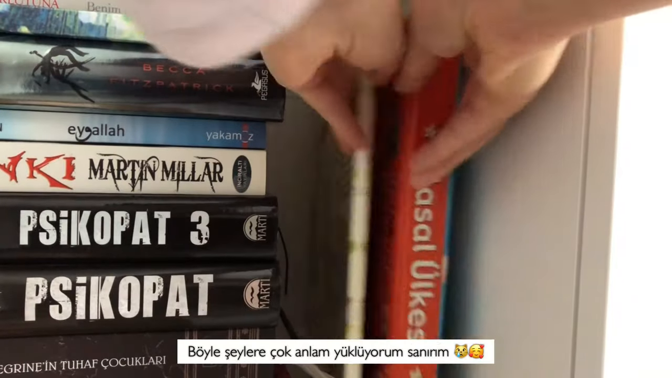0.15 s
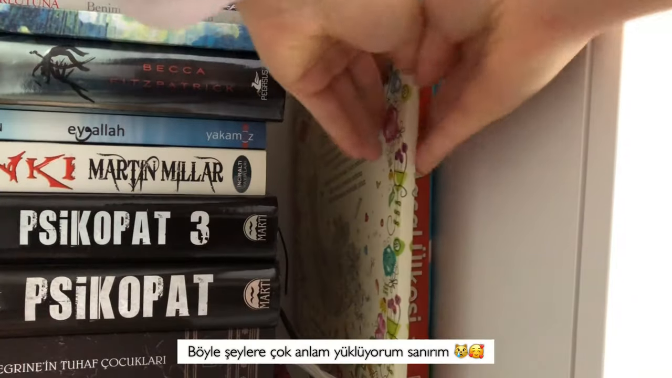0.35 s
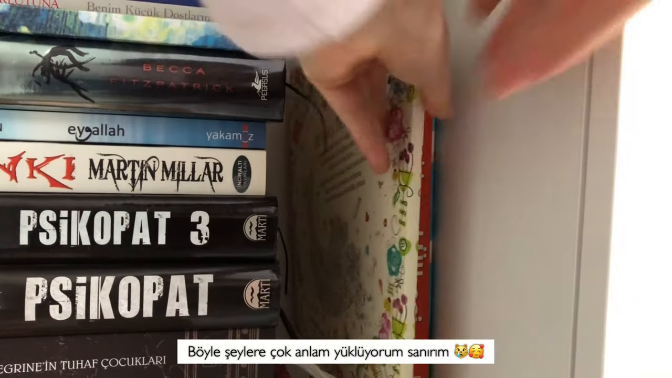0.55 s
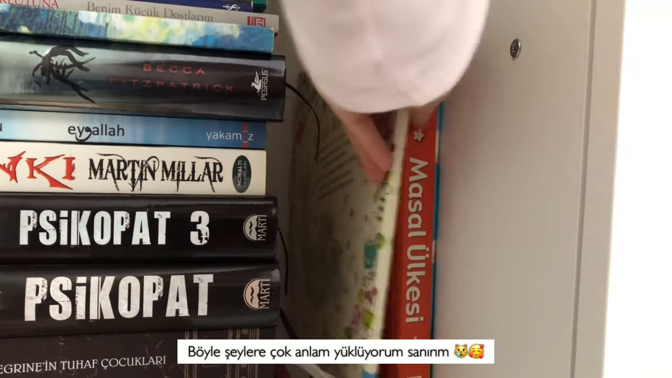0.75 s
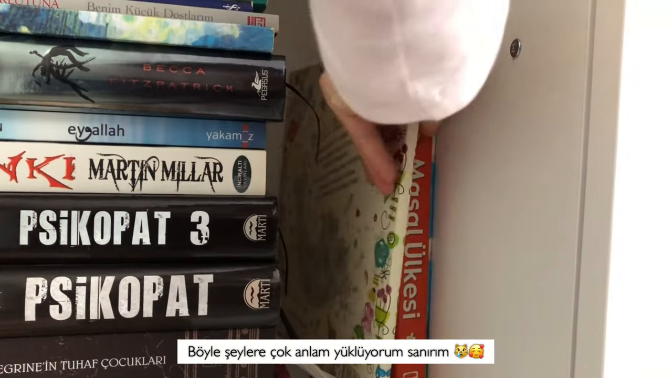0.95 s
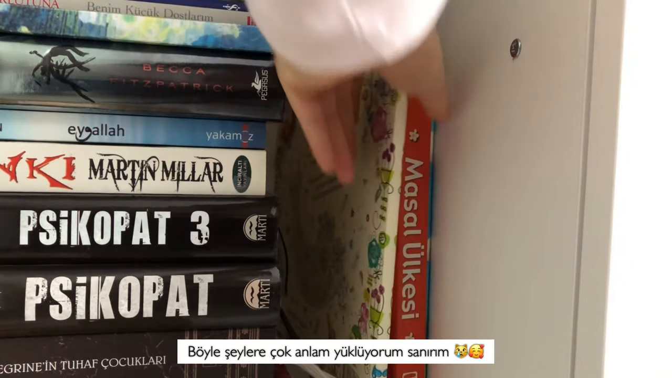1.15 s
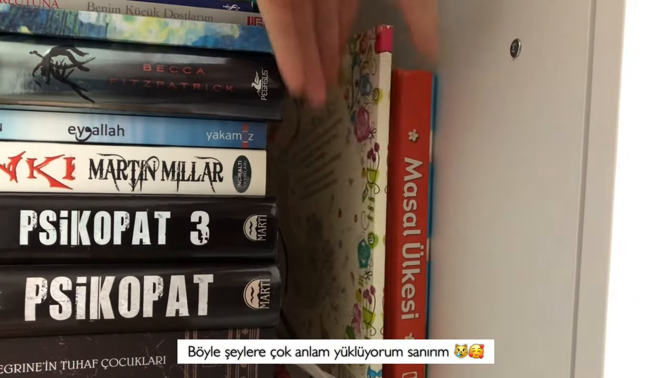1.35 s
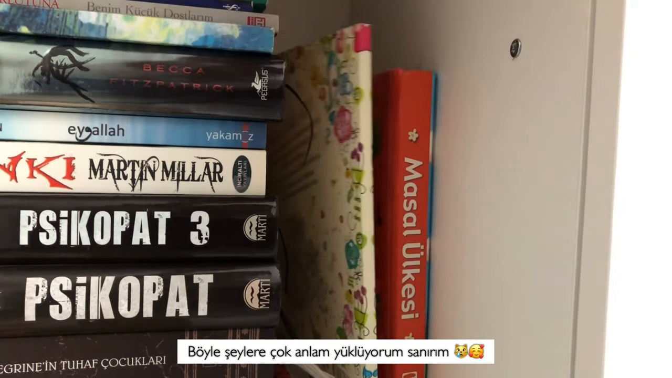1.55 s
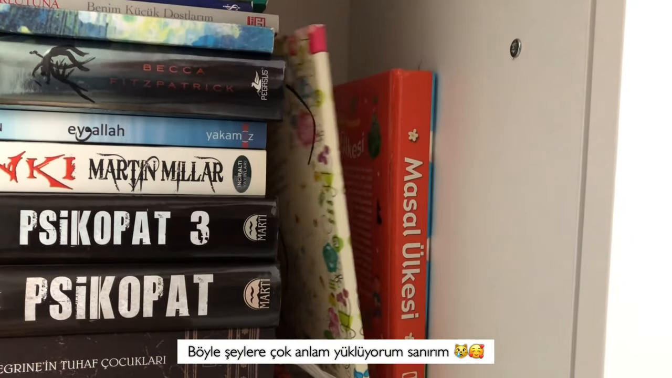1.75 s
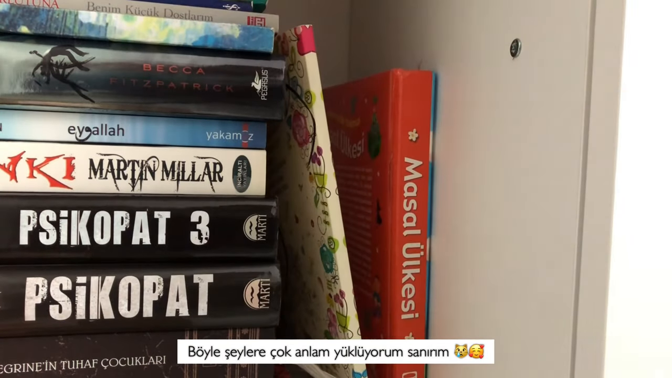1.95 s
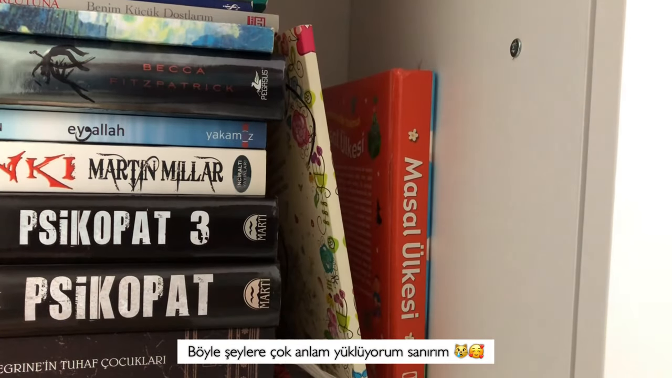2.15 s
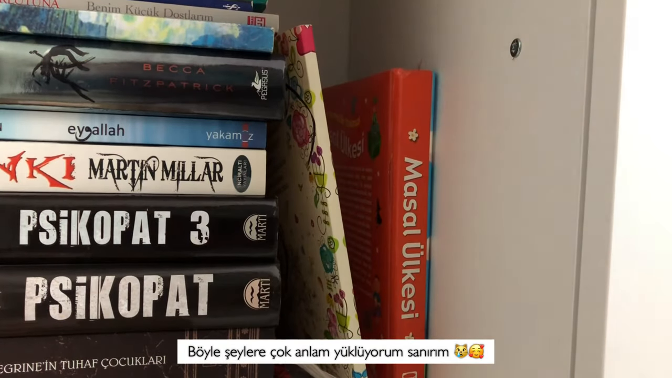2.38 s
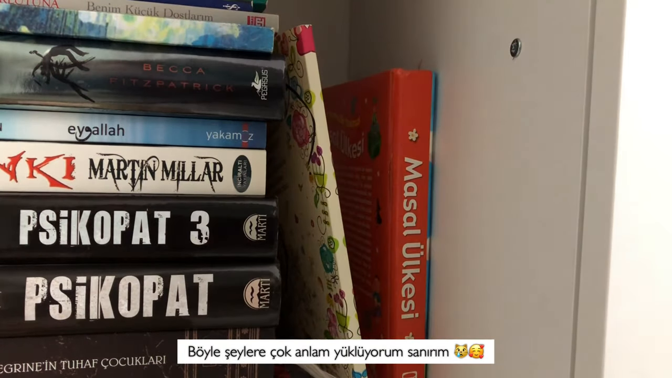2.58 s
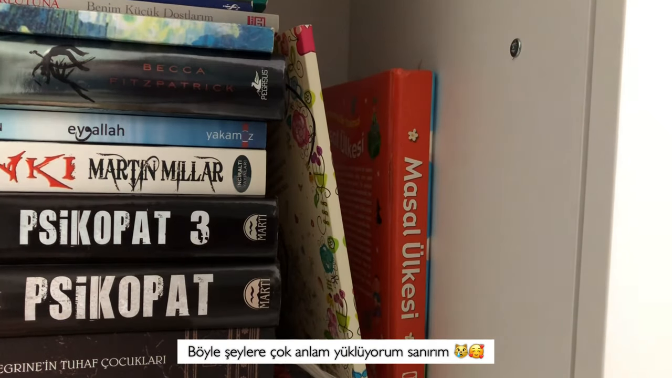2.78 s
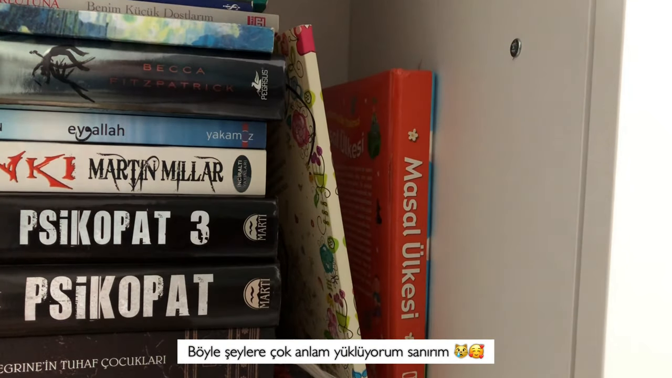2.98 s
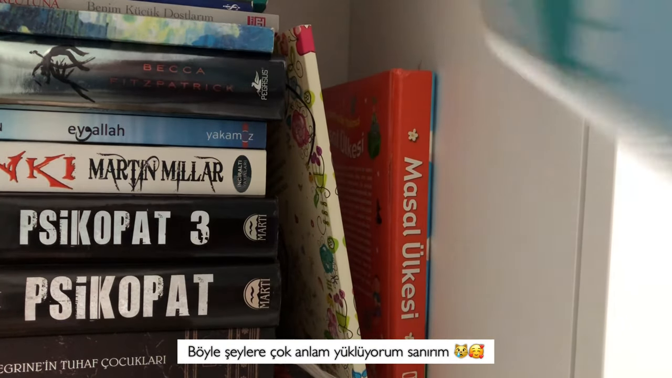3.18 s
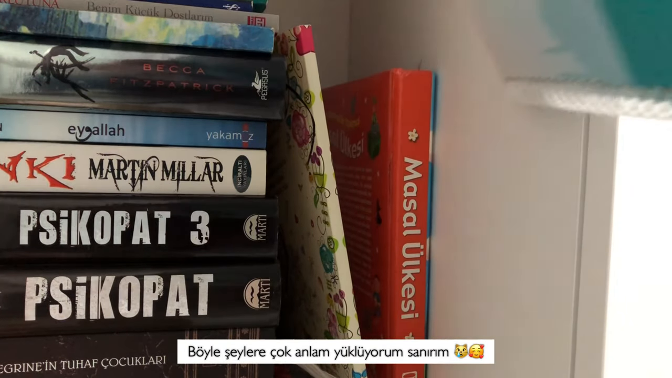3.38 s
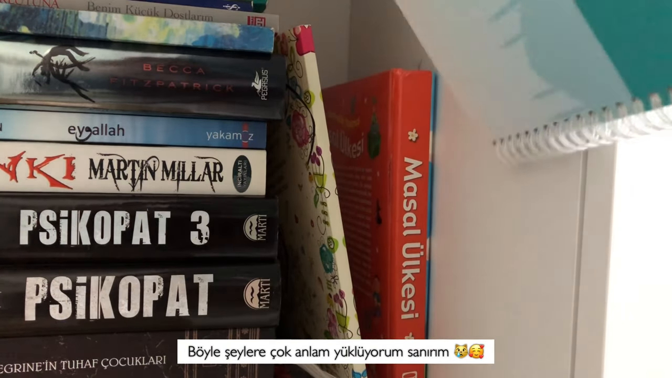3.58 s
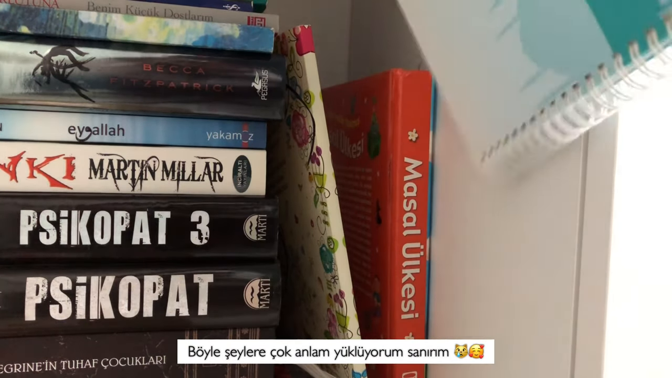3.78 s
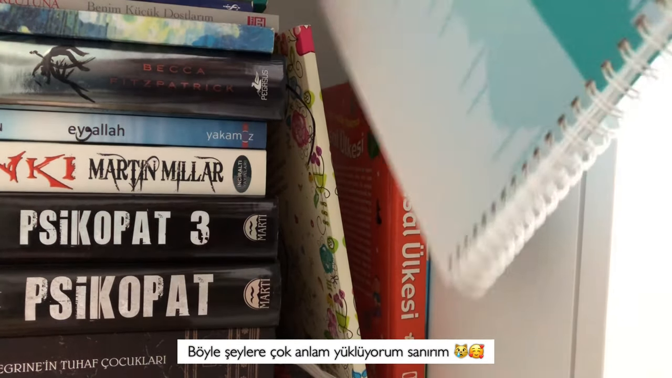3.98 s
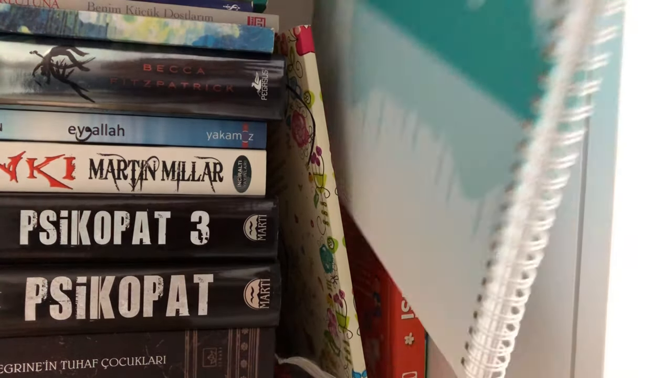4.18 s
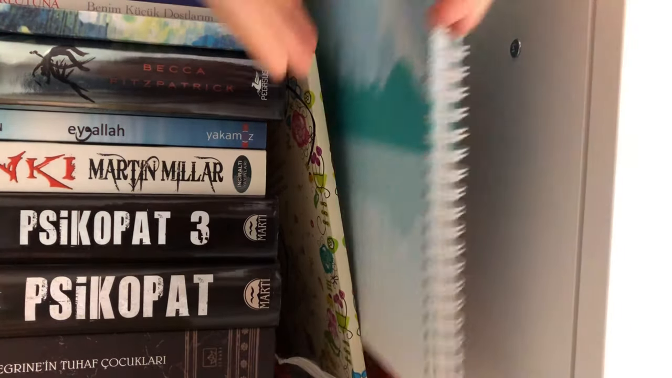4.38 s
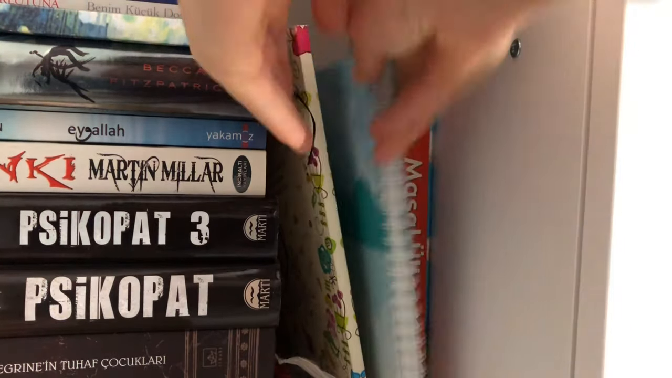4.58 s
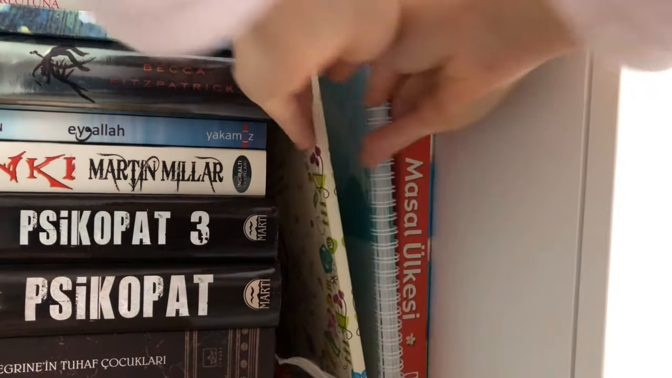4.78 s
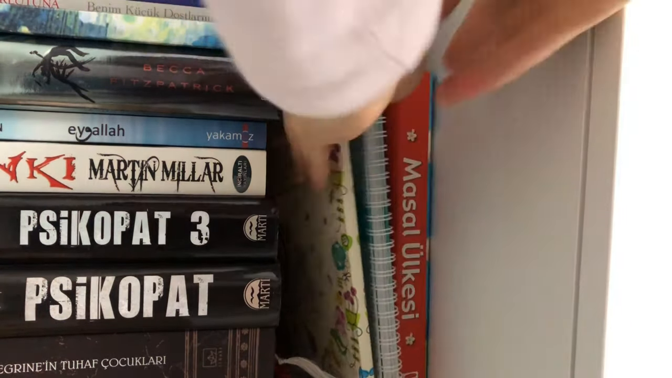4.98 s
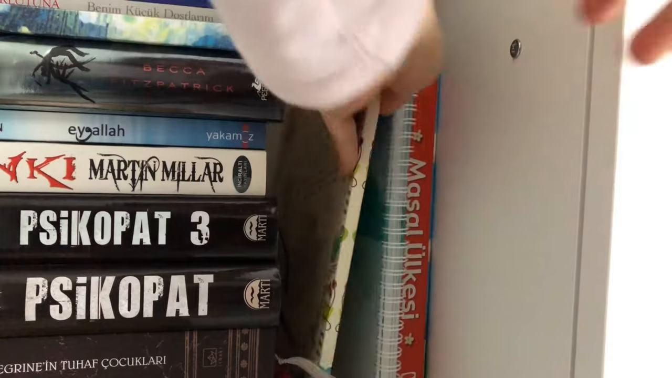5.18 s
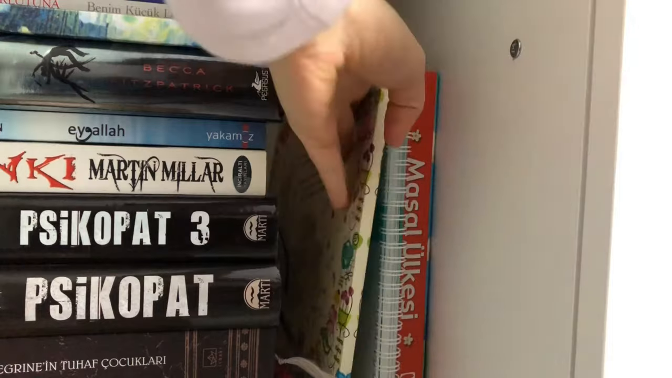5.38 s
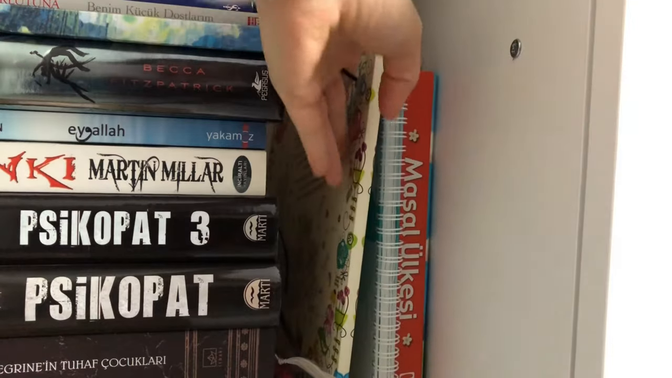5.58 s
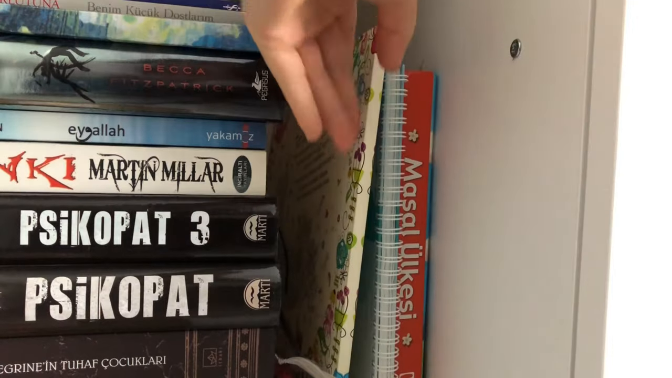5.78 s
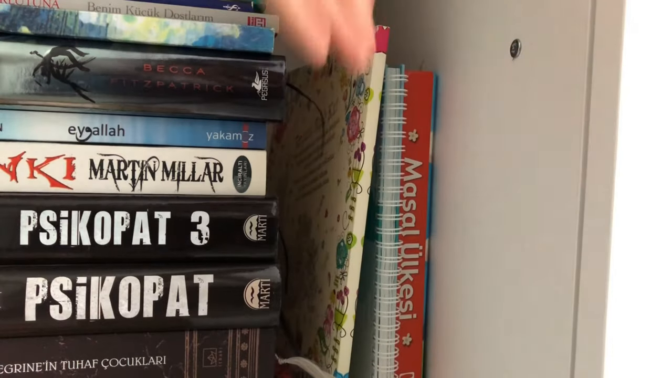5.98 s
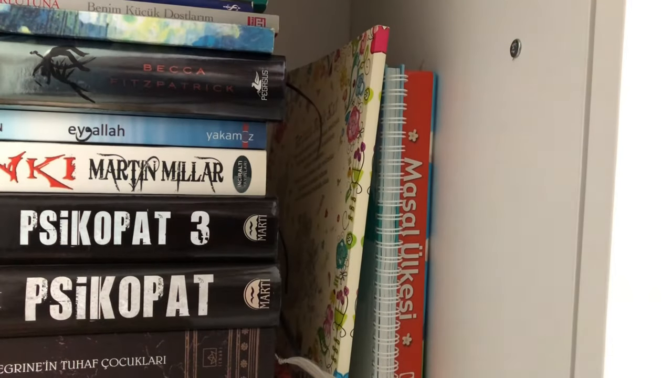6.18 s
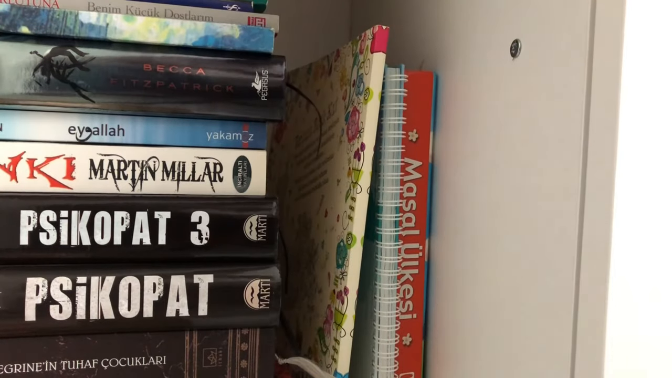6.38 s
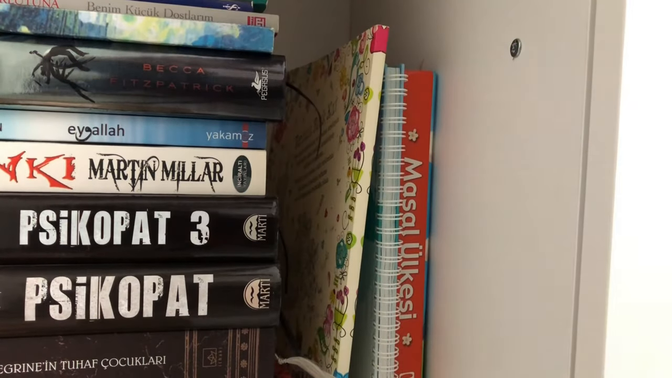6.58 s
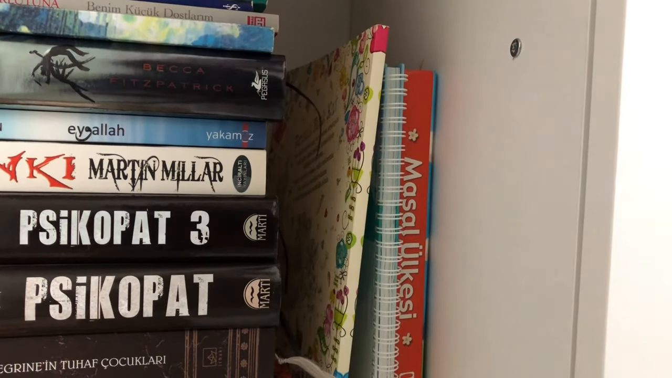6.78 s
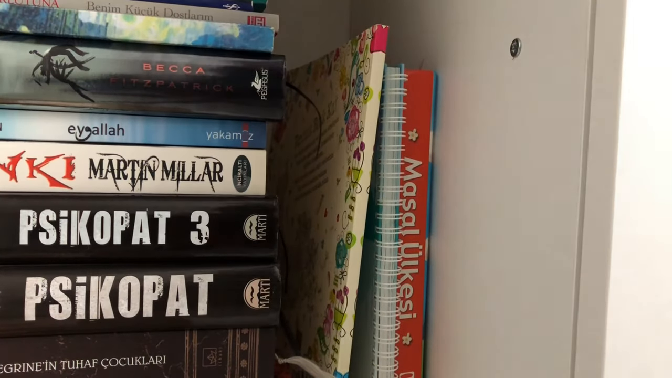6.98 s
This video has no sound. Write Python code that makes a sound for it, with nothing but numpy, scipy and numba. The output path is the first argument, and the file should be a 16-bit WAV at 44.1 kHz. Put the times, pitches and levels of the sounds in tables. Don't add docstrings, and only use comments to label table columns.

```python
import sys
import numpy as np
from scipy import signal
from scipy.fft import rfft, irfft, next_fast_len
from scipy.io import wavfile
from scipy.ndimage import uniform_filter1d
from numba import njit

SR = 44100
rng = np.random.default_rng(int(sys.argv[2]) if len(sys.argv) > 2 else 0)


def volts_from_decibels(level):
    exponent = np.asarray(level, float) / 20
    return 10 ** exponent


def wav_record(signal):
    frames = np.transpose(np.atleast_2d(signal))
    bounded = np.clip(frames, -1, 1)
    quanta = np.round(bounded * 32767).astype(np.int16)
    wavfile.write(sys.argv[1], SR, quanta)


N = 310464


def level(x, db):
    return x * volts_from_decibels(db) / np.sqrt(np.mean(x ** 2))


def peak(x):
    return x / np.abs(x).max()


def band(x, lo_hz, hi_hz, order=2):
    edges_hz = [lo_hz, min(hi_hz, .45 * SR)]
    return signal.sosfilt(signal.butter(order, edges_hz, "band", fs=SR, output="sos"), x)


def colour(x, points):
    size = next_fast_len(N)
    hz = np.maximum(np.arange(size // 2 + 1) * SR / size, 1)
    at_hz, db = np.transpose(points)
    gain = volts_from_decibels(np.interp(np.log(hz), np.log(at_hz), db))
    return irfft(rfft(x, size) * gain, size)[..., :N]


def fade(t, t60):
    return np.exp(-np.log(1000) * t / max(t60, .003))


def add(out, at_s, x):
    i = int(at_s * SR)
    out[i:i + len(x)] += x[:N - i]


def walk(rate):
    hold = int(SR / rate)
    steps = np.repeat(rng.standard_normal(N // hold + 1), hold)
    return 1.3 * uniform_filter1d(uniform_filter1d(steps, hold), hold)[:N]


def grains(rate, spread_db, share):
    size_db = np.minimum(spread_db * rng.exponential(size=N), 12)
    slips = (rng.random(N) < rate / SR) * volts_from_decibels(size_db) * rng.choice([-1, 1], N)
    share = np.clip(share, 0, 1)
    return np.sqrt(1 - share) * rng.standard_normal(N) + np.sqrt(share) * level(slips, 0)


def strokes(s, swell, ease, db, rest_db):
    end_drop_db, flatness = 15, 1.78
    t = np.arange(0, N, 64) / SR
    off = t[:, None] - s
    part = np.abs(off) / np.maximum(np.where(off < 0, swell, ease), .005)
    power = np.sum(volts_from_decibels(db - end_drop_db * part ** flatness) ** 2, axis=1) + volts_from_decibels(rest_db) ** 2
    return np.interp(np.arange(N) / SR, t, np.sqrt(power))


def bending(t, hz, t60, spread, rise_s):
    swell = 1 - np.exp(-t / rise_s)
    turns = hz * (t + spread * rise_s * swell)
    return np.sin(2 * np.pi * turns) * swell * fade((t / t60) ** 1.474, 0.82)


# pitch_hz [Hz], level_db [dB], t60_s [s]
SHELF_MODES = [(62.5, -3.5, 0.19), (90, -7, 0.24), (140, -1, 0.13), (184.5, -5.5, 0.24),
               (221.7, -5.5, 0.078), (272, -10, 0.22), (324.3, -7.5, 0.13), (398, -3.5, 0.044),
               (491, 0, 0.022), (602, -0.5, 0.029), (740, -7, 0.039), (880, -2, 0.0088), (1093, -8, 0.028),
               (1210, -9, 0.038), (1480, -1.5, 0.015), (1814, -13, 0.04), (2600, -37, 0.0373)]


def shelf(force):
    out = 0
    for k, (hz, db, t60) in enumerate(SHELF_MODES):
        pole = np.exp(2j * np.pi * hz / SR - np.log(1000) / (t60 * SR))
        out = out + (-1) ** k * volts_from_decibels(db) * signal.lfilter([1], [1, -pole], force).imag
    return out


# start_s [s], peak_db [dB], thud_hz [Hz], knock_re_thud_db [dB], t60_s [s]
ON_BOARD = [(0.082, -16.5, 209, -9, 0.089), (.143, -1, 179, -14.5, 0.056), (0.311, -15.5, 149, -22, 0.17),
            (0.779, -20, 201, -16, 0.049), (.842, -14, 124, -30, .1), (.862, -8, 72.6, -25, .1),
            (0.924, -17, 138, -21, 0.06), (2.53, -30, 257, -13, 0.16), (1.795, -27.5, 140, -11.5, 0.089),
            (3.186, -16, 214, -4.5, 0.049), (3.736, -11, 195, -13.5, 0.027),
            (3.782, -9.5, 170, -10.5, 0.05), (3.859, -20.5, 211.6, -16, 0.25),
            (3.8939, -4, 196, -12.5, 0.11), (3.958, -12, 135, -17, 0.12), (5.155, -8.5, 250, -7.5, 0.055),
            (5.207, -7, 200, -14.5, 0.071), (5.262, -13.5, 140, -18.5, 0.081)]
ON_WALL = [
    (.166, -9, 222, -1.5, 0.024),
    (0.277, -18, 100, -12, 0.079),
    (2.398, -26.5, 109, -8.5, 0.065),
    (3.0764, 2.5, 198, -20.5, 0.082),
    (4.508, 13, 192.4, -12, 0.094),
    (4.544, 4, 242, -19.5, 0.044),
    (5.298, -15, 149, -19, 0.099),
]
ON_EDGE = [(0.209, -6.5, 167, -25, 0.074), (.73, -24.5, 131, -28, 0.079), (.826, -6, 136, -12.5, 0.053),
           (3.494, -25, 99, -16, 0.13), (3.713, -19, 229, -9.5, 0.039), (4.396, -29, 194, -6.5, 0.12),
           (4.62, 7.5, 317, -3, 0.058), (4.712, 6, 200, -11, 0.068), (4.732, 0.5, 160, -20.5, 0.073),
           (2.572, -26, 109, -25, .12), (4.758, 5, 204, -14.5, 0.018), (5.179, -6.5, 273, -7.5, 0.019)]
# start_s [s], peak_db [dB], knock_hz [Hz],
# knock_re_thud_db [dB], t60_s [s]
COVER_TAPS = [
    (1.6, -39, 538, 8, 0.072),
    (1.912, -46, 740, 3, 0.17),
    (2.026, -27, 650, 0.5, 0.06),
    (2.084, -36.5, 610, 2, 0.054),
    (3.871, -20, 695, -2, 0.037),
    (3.3, -15.5, 813, -10, 0.065),
    (3.658, -35, 640, -8, 0.082),
    (6.436, -44.5, 2600, 4, 0.057),
    (6.961, -31.5, 583, 2.5, 0.07),
]


def knocks():
    direct, force = np.zeros(N), np.zeros(N)
    t = np.arange(int(.3 * SR)) / SR
    places = ((386, ON_BOARD), (523.3, ON_WALL), (605, ON_EDGE))
    blows = [(hz, *row) for hz, rows in places for row in rows]
    tap_thud_hz = 120
    blows += [(hz, s, db, tap_thud_hz, knock_db, t60) for s, db, hz, knock_db, t60 in COVER_TAPS]
    for knock_hz, s, db, thud_hz, knock_db, t60 in blows:
        thud = bending(t, thud_hz, t60, spread=0.83, rise_s=0.0037)
        knock = bending(t, knock_hz, .5 * t60, spread=0.91, rise_s=0.00091)
        add(direct, s, volts_from_decibels(db - 2.5) * (thud + volts_from_decibels(knock_db + 8) * knock))
        top_hz = knock_hz * 7.0 * volts_from_decibels(1.18 * knock_db) + 1.2 * thud_hz
        shake = band(rng.standard_normal(len(t)), 0.48 * thud_hz, top_hz)
        add(force, s, volts_from_decibels(db - 26.0 + 0.33 * knock_db) * shake * fade(t, 0.89 * t60))
    return direct + shelf(force)


# start_s [s], peak_db [dB], pitch_hz [Hz], t60_s [s]
CORNER_RAPS = [(.0795, -23, 704, 0.023), (.144, -17, 560, .03), (.2795, -20, 545, 0.026),
               (.826, -23.5, 640, 0.052), (1.531, -38, 723, 0.035), (1.797, -31, 415, .03),
               (1.883, -37, 687, 0.079), (1.921, -38, 695, 0.037), (2.026, -24, 704, .025),
               (2.038, -33, 725, 0.05), (2.143, -35, 595, 0.059), (2.399, -33, 574, 0.022),
               (3.073, -13.5, 590, 0.027), (3.145, -29, 600, .04), (3.188, -21, 618, 0.026),
               (3.375, -37, 575, 0.042), (3.501, -30.5, 580, 0.046), (3.766, -21, 627, .025),
               (3.784, -20.5, 685, .03), (3.893, -15.5, 717, 0.033), (4.006, -40, 720, .03),
               (4.508, -2, 1254, 0.032), (4.526, -6, 479, 0.049), (4.623, 4, 620, 0.062),
               (4.658, -10, 610, .05), (4.734, -10, 410, .035), (4.757, -7, 620, .035),
               (4.967, -33, 720, 0.037), (5.129, -30, 430, .04), (5.146, -20, 600, 0.026),
               (5.158, -17.5, 796, .025), (5.178, -17.5, 900, .025), (5.299, -26, 550, 0.033),
               (6.438, -40, 600, 0.03), (6.557, -41, 560, 0.042), (6.818, -46, 610, .07),
               (6.861, -44.5, 615, 0.055), (6.984, -32, 657, 0.041), (7.028, -32.5, 640, 0.036)]


def raps():
    out = np.zeros(N)
    t = np.arange(int(.15 * SR)) / SR
    for s, db, hz, t60 in CORNER_RAPS:
        add(out, s, volts_from_decibels(db + 1.0) * bending(t, hz, t60, spread=0.63, rise_s=.0012))
    return out


def ticks(table, t60, click):
    out = np.zeros(N)
    t = np.arange(int(.12 * SR)) / SR
    decay = fade(t, t60) + volts_from_decibels(-22) * fade(t, 6 * t60)
    for s, db, hz, edge_db in table:
        grit = rng.standard_normal((2, len(t))) * decay
        grit[:, 0] += click
        body = peak(band(grit[0], hz / 1.6, hz * 1.554))
        edge = peak(band(grit[1], 9200, 16900, order=1))
        add(out, s + .001, volts_from_decibels(db - 1.5) * peak(body + volts_from_decibels(edge_db + 8) * edge))
    return out


# start_s [s], end_s [s], snaps [count], mean_peak_db [dB]
CRACKLE_RUNS = [
    (.07, .38, 22, -23),
    (.96, 1.105, 8, -29),
    (5.42, 5.56, 10, -27),
]


def crackle():
    rows = []
    for start, end, count, db in CRACKLE_RUNS:
        when, size, pitch, edge = rng.random((count, 4)).T
        place = (np.arange(count) + when) / count
        at_s = start + place * (end - start)
        rows += zip(at_s, db + 12 * (size - .5), 1700 * 4 ** pitch, 24 * edge - 20)
    return rows


# start_s [s], peak_db [dB], centre_hz [Hz], edge_re_peak_db [dB]
COVER_SNAPS = [(.0757, -12, 2260, -8.5), (.163, 4, 7850, -3), (.1674, -5, 5350, -16),
               (.2145, -4.5, 3260, -1), (.3526, -8.5, 5330, 3), (.4315, -6, 4300, -4),
               (.4464, -22, 5500, -6), (.714, -14.5, 3640, -6), (.7844, -10.5, 1790, 3),
               (.7917, -3, 5400, -1.5), (.8729, -20.5, 1500, -15), (.916, -21, 1600, -10),
               (.105, -19, 3500, -7), (.369, -19, 3400, -5), (.266, -17, 1510, -12), (.9622, -25, 3300, -5),
               (.991, -19, 1620, -1), (1.013, -21, 3800, -5), (1.023, -28, 1687, -10),
               (1.031, -29, 3000, -8), (1.065, -21, 2500, -3), (.8874, -18, 1760, -15),
               (.9014, -8.5, 1730, 5), (.9244, -19, 1820, -14), (.9704, -32, 6650, -14),
               (.9802, -10.5, 1720, 9), (1.0425, -5.5, 5090, -2), (1.0544, -14, 2840, 24),
               (1.0879, -10, 3400, 1), (1.1049, -7, 3400, 24), (1.1498, -3.5, 7900, 45),
               (1.2361, -12, 5700, 5), (1.3299, -28, 1760, 0),
               (.124, -21, 4000, -12),
    (.241, -17, 3140, -10),
    (.255, -17, 4000, 0),
    (.2805, -15, 4500, -2),
    (.294, -19, 4500, -14),
    (.3158, -17, 11300, -8),
    (.333, -22, 3000, -14),
    (.346, -21, 12500, -6),
    (3.226, -30, 8500, -6),
    (3.437, -31, 13500, -4),
               (.7864, -8.5, 5250, -6), (.8964, -21, 10400, -4), (.9444, -30, 5050, -4),
               (.971, -24, 5670, -8), (1.0026, -14, 12700, -4), (1.0316, -16, 5400, -8),
               (1.0484, -14, 14000, -4), (1.0574, -14, 13500, -4), (1.0744, -20, 11700, -4),
               (1.0924, -18, 13900, -4), (1.0974, -17, 12400, -2), (1.1164, -25, 5000, -10),
               (1.1338, -18, 11600, -4), (1.2101, -27, 7000, -4)]


def covers():
    return ticks(COVER_SNAPS + crackle(), t60=.009, click=7)


# start_s [s], peak_db [dB], centre_hz [Hz], edge_re_peak_db [dB]
CARD_SNAPS = [(2.0253, -27.5, 2970, -4), (2.0348, -21, 1540, 13), (2.139, -18, 3360, -3),
              (3.0719, -15.5, 2250, -7.5), (3.1886, -21.5, 2200, -20), (3.2954, -9, 14000, -6),
              (3.2958, -12.5, 1940, -22.5), (3.3687, -19.5, 1630, -2.5), (3.462, -34.5, 2560, -28),
              (3.4955, -18, 7300, -13.5), (3.6386, -26.5, 2150, -7), (3.6641, -20.5, 1660, -8.5),
              (3.6885, -22.5, 2260, -26), (3.7369, -24.5, 3590, -32), (3.7844, -16, 4830, 9),
              (3.8586, -19.5, 1520, -7), (3.8916, -22, 1700, -7), (3.9564, -25, 1800, -14),
              (4.3959, -15, 1480, -27.5), (4.4154, -11.5, 1560, 1), (4.489, -22, 1500, -16.5),
              (4.5067, 0, 2400, -18), (4.546, -19.5, 2000, -18), (4.6114, -11.5, 2190, 0.5),
              (4.6204, 0, 1680, -24.5), (4.7107, -4, 1920, -9), (5.0624, -20, 2560, -4),
              (5.1432, -4, 1880, -1), (5.1564, -5, 1470, 2), (5.1821, -12.5, 4130, -3),
              (5.1272, -35, 1300, -10), (5.167, -24, 2000, -12), (5.2964, -23.5, 1500, -6),
              (5.3198, -27.5, 1400, -7), (3.8177, -28, 1450, -20), (5.2614, -18, 1540, -6.5),
              (7.0264, -10, 4800, -13)]


def cards():
    return ticks(CARD_SNAPS, t60=.026, click=4)


# start_s [s], peak_db [dB], centre_hz [Hz], edge_re_peak_db [dB]
WIRE_TICKS = [(5.3767, -5, 4140, 5), (5.4051, -13, 3570, 12), (5.4276, -22, 3340, -7),
              (5.4424, -8.5, 5200, 14), (5.4525, -9, 3150, -0.5), (5.4689, -17, 6440, 3),
              (5.4759, -3.5, 5140, 3), (5.4814, 1.5, 8950, 10), (5.5049, -7, 6700, -13),
              (5.5164, -12, 3100, 10), (5.5303, -14, 3700, -6), (5.5428, -4, 3250, -3.5),
              (5.5474, -9, 3570, -1), (5.5554, -33, 4300, -10), (5.6236, -19.5, 5160, 4),
              (5.77, -29, 4000, -4.5), (5.8636, -17.5, 6640, 20), (5.9214, -21.5, 2230, 9)]


def wire_loops():
    return ticks(WIRE_TICKS, t60=.009, click=7)


# start_s [s], length_s [s], level_db [dB], centre_hz [Hz], width [ratio to centre]
EDGE_SCRAPES = [(0.199, 0.02, -28, 2360, 1), (0.275, 0.011, -26, 1430, 0.89), (.24, .032, -34.5, 1530, 0.3),
                (4.805, 0.064, -38.5, 2500, 0.9), (1.152, 0.022, -36.5, 2500, 1.4),
                (2.259, 0.098, -44, 830, 0.58), (3.066, 0.2, -44, 2560, 0.18),
                (3.2963, 0.0062, -15.5, 6500, 0.24), (3.141, 0.018, -27.5, 1640, 1.4),
                (3.298, 0.063, -42, 6900, 0.35), (3.3, 0.14, -44, 1340, 0.5), (3.49, 0.048, -47, 7350, 0.2),
                (3.296, .016, -27, 14800, .15), (3.3, .07, -45, 14800, .15), (3.369, .02, -40, 14800, .15),
                (3.495, .05, -42, 14900, .12), (1.03, .085, -38, 14800, .15), (.163, .05, -33, 6000, 1.2),
                (3.853, 0.077, -41.5, 3400, 0.8), (4.412, 0.048, -30.5, 1250, 1.26),
                (4.482, .025, -34.5, 1070, 1.2), (4.515, 0.079, -38.5, 2800, 0.51),
                (5.139, 0.042, -26.5, 960, 0.83), (3.858, 0.024, -31.5, 810, 0.48),
                (3.495, 0.019, -33, 1020, 1.4)]


def scrapes():
    out = np.zeros(N)
    rattle = grains(rate=400, spread_db=1.0, share=0.73)
    for s, length, db, hz, width in EDGE_SCRAPES:
        u = np.linspace(0, 1, int(length * SR))
        spread = 1 + max(width, .05) / 2
        part = band(rattle[int(s * SR):][:len(u)], hz / spread, hz * spread)
        add(out, s, level(part, db) * np.minimum(6 * u, 1) * (1 - u ** 2))
    return out


# fastest_s [s], swell_s [s], ease_s [s], level_db [dB], fine_fibres_re_level_db [dB]
HAND_STROKES = [(.1, 0.15, 0.1, -40, 7), (.19, .06, .16, -37, 6), (.33, 0.1, 0.1, -45, 6.5),
                (.45, .1, .2, -55, 3), (.55, 0.046, 0.11, -50.5, 4), (.72, 0.078, 0.13, -41, 5),
                (.79, 0.051, 0.18, -37, 6), (.915, 0.058, .02, -40, -3), (1.07, 0.092, 0.046, -46, 9),
                (1.19, 0.094, 0.049, -51.5, 8.5), (1.5, 0.28, 0.15, -54.5, -2),
                (1.701, 0.19, 0.11, -46.5, 5.5), (1.9, 0.29, 0.069, -52.5, -5),
                (2.06, 0.048, 0.43, -51, 3.5), (2.321, .11, 0.084, -42, 5),
                (3.147, 0.055, 0.058, -42, 3), (3.33, 0.044, 0.14, -48.5, -5),
                    (3.6, 0.13, 0.24, -49, -6), (3.76, 0.11, 0.18, -41, 7.5),
                    (3.92, 0.061, 0.28, -45.5, 1.5), (4.431, 0.14, 0.17, -42, 4.5),
                    (4.56, 0.15, 0.44, -41.5, 5), (4.82, 0.11, 0.61, -41, 2.5),
                    (5.18, 0.15, 0.057, -40, 6.5), (5.32, 0.13, 0.041, -48.5, 10.5),
                    (5.5, .08, 0.12, -46.5, 7), (6.2, 0.87, 1.5, -54.5, 2.5), (6.3, 0.09, 0.32, -50.5, -18),
                    (6.58, 0.17, 0.094, -54.5, 16.5), (6.978, 0.034, 0.15, -46.5, -6.5)]


def sliding():
    still_db, still_fine_db = -63, -68
    s, swell, ease, db, fine_db = np.transpose(HAND_STROKES)
    pressure = strokes(s, swell, ease, db, still_db)
    fine_pressure = strokes(s, swell, ease, db + fine_db, still_fine_db)
    grip = np.clip(pressure / volts_from_decibels(-44), .3, 1)
    rub = grains(rate=1200, spread_db=-6.5, share=0.23)
    patch = 2.12 * grip * walk(90)
    paper = colour(rub, [(500, -8.5), (1300, -1.0), (3000, -1.5), (6000, -5.0), (10000, -12.0), (16000, -27)])
    fine = colour(rub, [(3000, -30.0), (5500, -10), (9000, -5.0), (16000, 4.5)])
    paper = level(paper, 0.066) * volts_from_decibels(patch + 0.5 * grip * walk(34)) * pressure
    return paper + level(fine, 0.232) * volts_from_decibels(patch) * fine_pressure


# centre_s [s], half_length_s [s], level_db [dB]
WEIGHT_SHOVES = [(.3, 0.18, -33), (0.892, 0.11, -25), (1.586, 0.67, -42.5), (2.425, 0.066, -29),
                 (2.573, 0.13, -29), (3.206, 0.093, -28.5), (3.654, .15, -49), (4.01, 0.14, -32.5),
                 (4.62, 0.26, -37), (4.798, 0.2, -25), (5.123, 0.11, -36), (5.277, 0.11, -25.5),
                 (7.04, 0.084, -39.5)]
EDGE_DRAGS = [(.2, 0.28, -40.5), (1.05, 0.55, -50.5), (1.75, 0.5, -43), (2.4, 0.34, -49), (2.6, 0.079, -49),
              (3.19, 0.078, -40.5), (3.8, 0.4, -48.5), (4.64, 0.21, -29.5), (5.1, 0.36, -44),
              (5.451, 0.22, -48), (6.4, 0.22, -58.5)]


def dragging():
    rest_db, rest_scrape_db = -44.5, -56.5
    s, half, db = np.transpose(WEIGHT_SHOVES)
    drag_s, drag_half, drag_db = np.transpose(EDGE_DRAGS)
    drag = shelf(grains(rate=160, spread_db=7.0, share=0.62))
    rumble = level(band(drag, 45, 141), -2.0) * volts_from_decibels(1.6 * walk(7.5))
    rumble = rumble * strokes(s, half, half, db, rest_db)
    grit = 4.0 * grains(rate=440, spread_db=1.0, share=.4)
    scrape = level(band(drag + grit, 224, 1780), -0.054) * volts_from_decibels(3.1 * walk(30))
    return rumble + scrape * strokes(drag_s, drag_half, drag_half, drag_db, rest_scrape_db)


@njit
def walls(x, lags, gain, damp):
    line, soft, out = np.zeros((8, 4096)), np.zeros(8), np.zeros(len(x))
    for i in range(len(x)):
        total = 0.
        for k in range(8):
            soft[k] += (1 - damp) * (gain[k] * line[k, (i - lags[k]) & 4095] - soft[k])
            total += soft[k]
        out[i] = total
        for k in range(8):
            line[k, i & 4095] = x[i] + soft[k] - total / 4
    return out


def room(hits):
    t60_s, damp, echo_db = 0.35, 0.7, -25
    lags = np.geomspace(263, 1790, 8).astype(int)
    return volts_from_decibels(echo_db) * walls(hits, lags, volts_from_decibels(-60 * lags / SR / t60_s), damp)


# pitch_hz [Hz], level_db [dB per Hz]
HUM_SPECTRUM = [(19, -43), (32, -6), (75, -16), (188, -27.5), (225, -17.5), (263, -30.5), (299, -21),
                (466, -33.5), (688, -30), (893, -34.5), (16000, -61)]


def hum():
    hum_db = -41
    return level(colour(rng.standard_normal(N), HUM_SPECTRUM), hum_db - 7.5) * volts_from_decibels(0.3 * walk(1.93))


def scene():
    hits = knocks() + raps() + covers() + cards() + wire_loops() + scrapes()
    return (hits + sliding() + dragging() + room(hits) + hum())[None]


# pitch_hz [Hz], level_db [dB]
PORT_TREBLE = [(6000, 1), (9000, 0), (12000, -1), (15500, 0)]


def phone_port(dry):
    return colour(dry, PORT_TREBLE)


def top_cut(x):
    return signal.sosfilt(signal.butter(12, 16880, fs=SR, output="sos"), x)


def record(dry):
    x = signal.sosfilt(signal.butter(6, 42, "high", fs=SR, output="sos"), phone_port(dry))
    x = signal.sosfilt(signal.ellip(8, .2, 40, 15750, fs=SR, output="sos"), x)
    x = np.clip(x, -1, 1)
    return top_cut(x)


dry = scene()
out = record(dry)
wav_record(out)
```